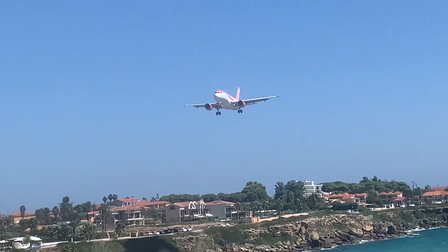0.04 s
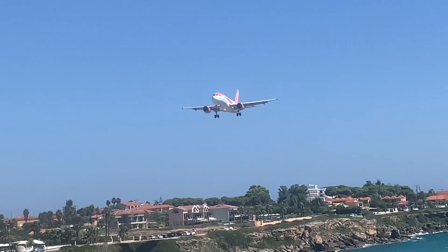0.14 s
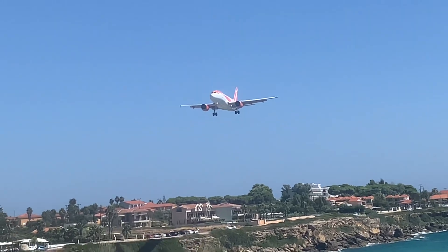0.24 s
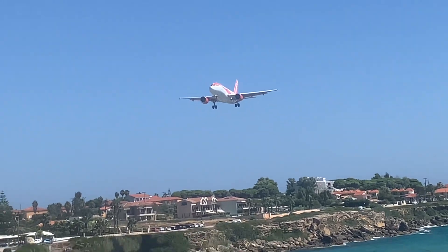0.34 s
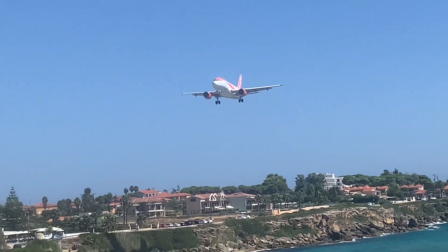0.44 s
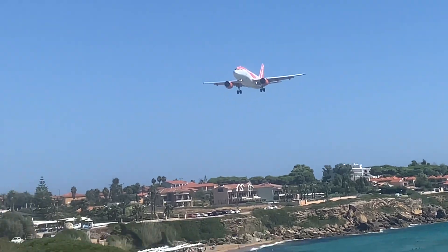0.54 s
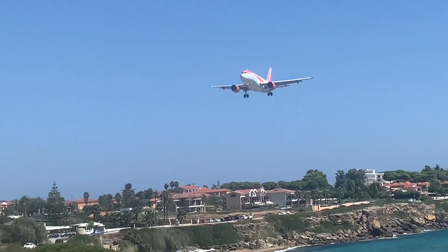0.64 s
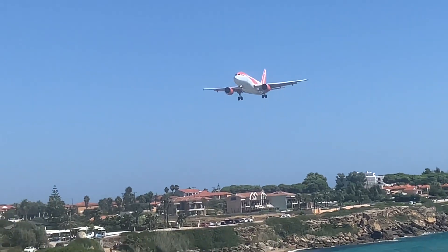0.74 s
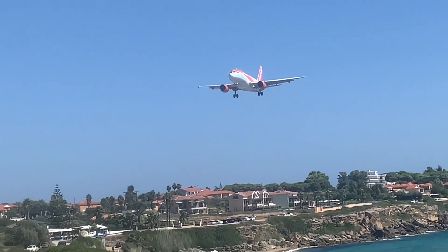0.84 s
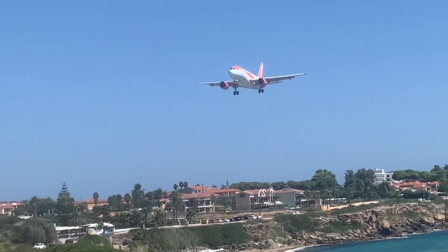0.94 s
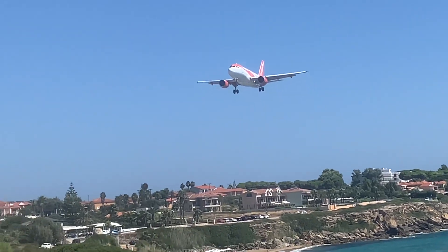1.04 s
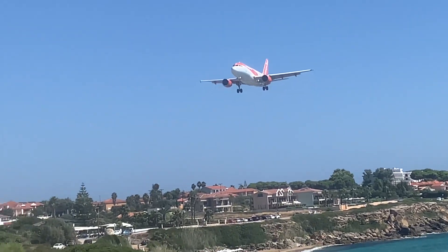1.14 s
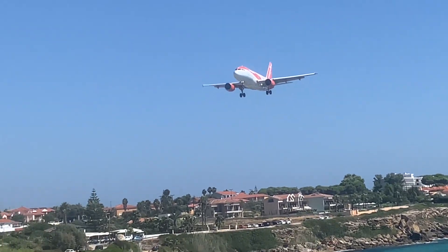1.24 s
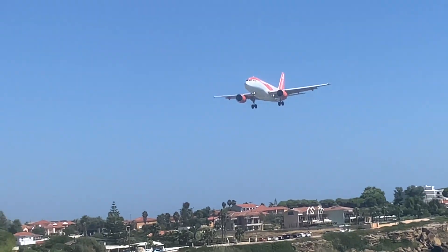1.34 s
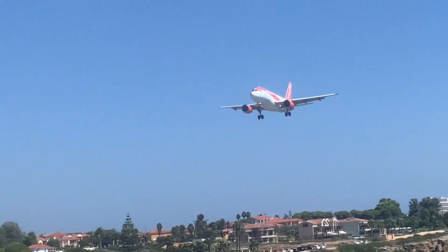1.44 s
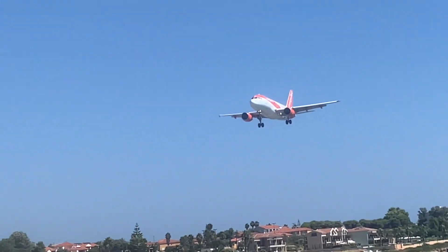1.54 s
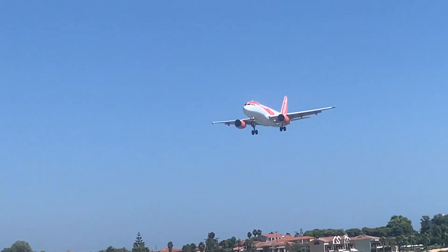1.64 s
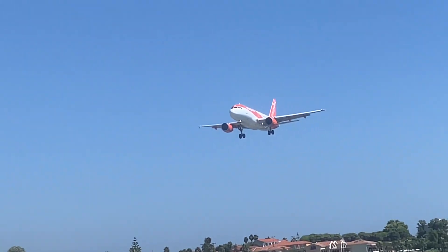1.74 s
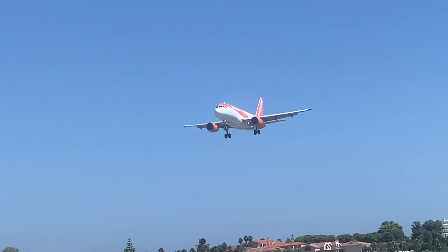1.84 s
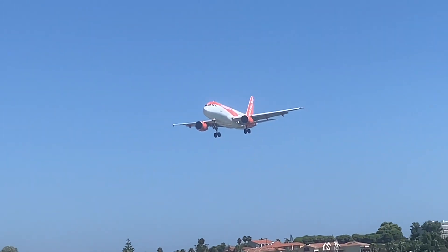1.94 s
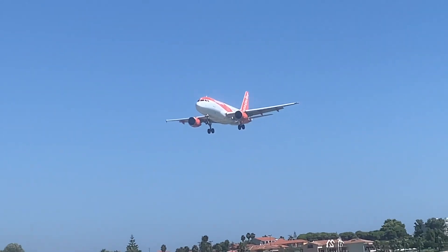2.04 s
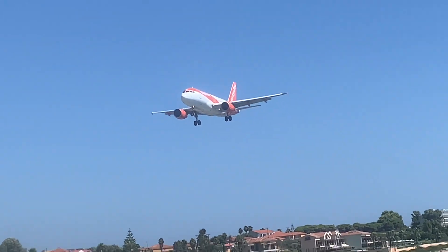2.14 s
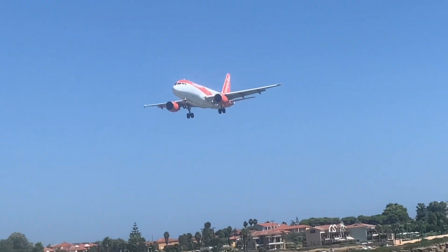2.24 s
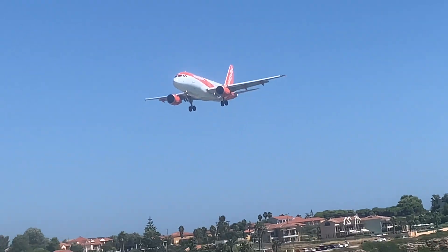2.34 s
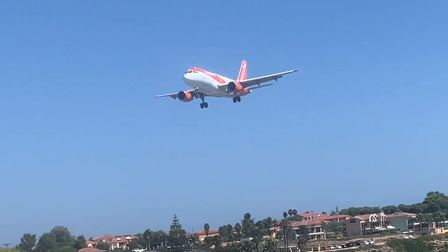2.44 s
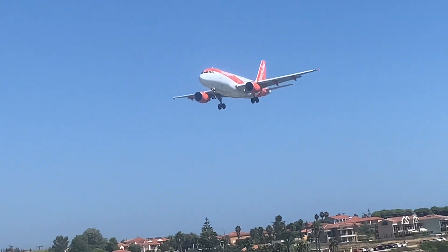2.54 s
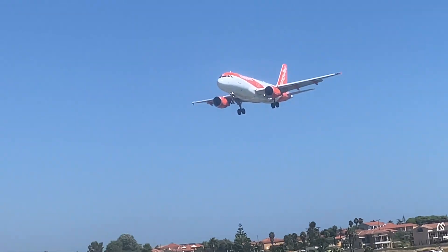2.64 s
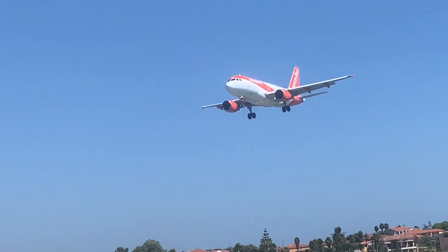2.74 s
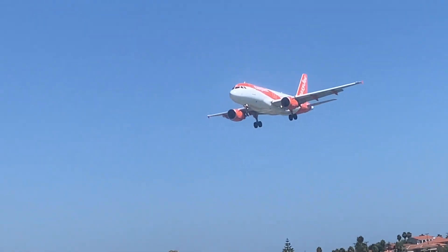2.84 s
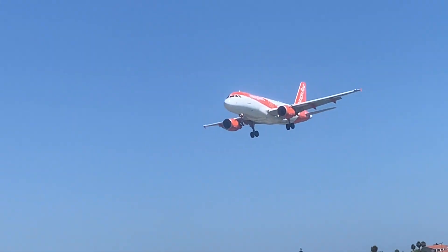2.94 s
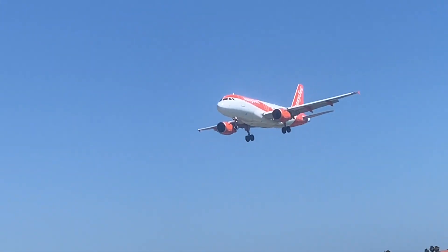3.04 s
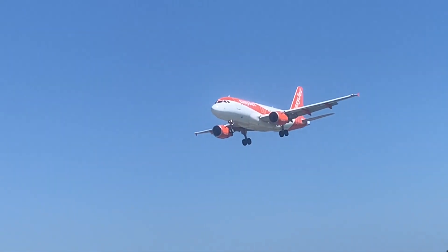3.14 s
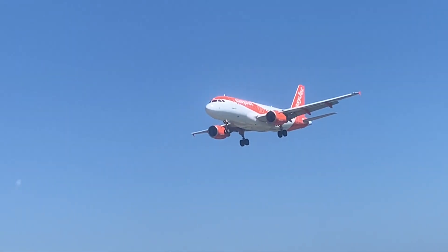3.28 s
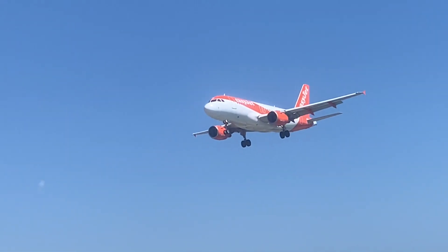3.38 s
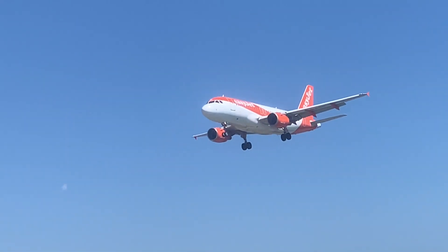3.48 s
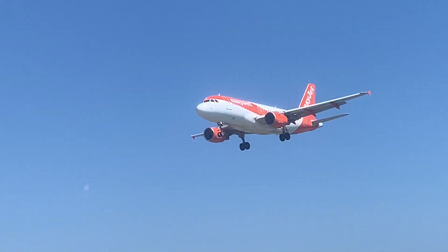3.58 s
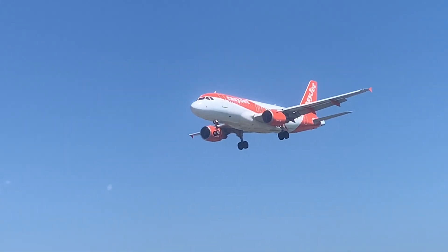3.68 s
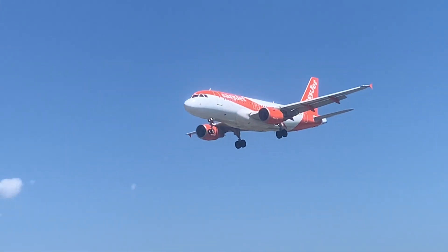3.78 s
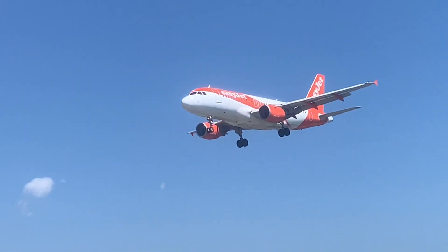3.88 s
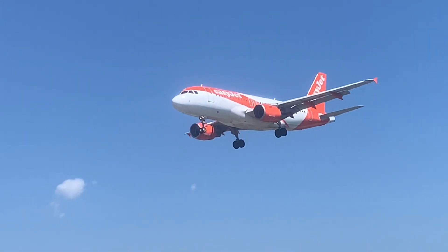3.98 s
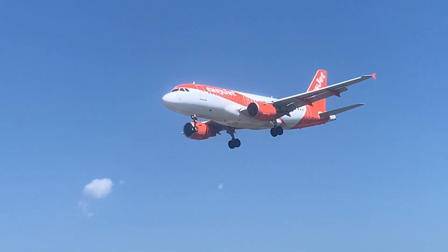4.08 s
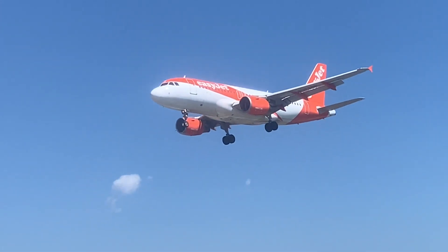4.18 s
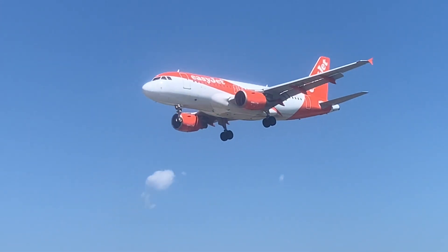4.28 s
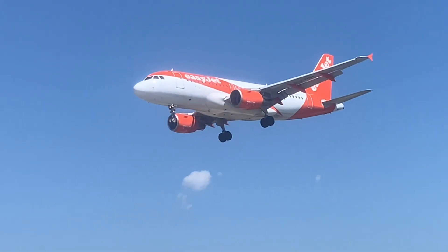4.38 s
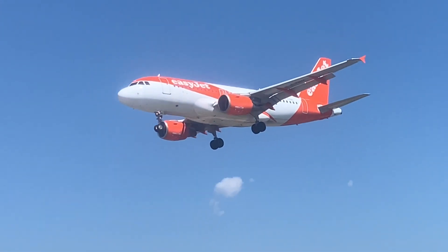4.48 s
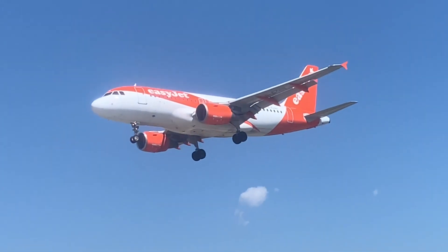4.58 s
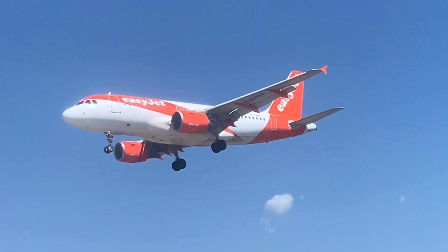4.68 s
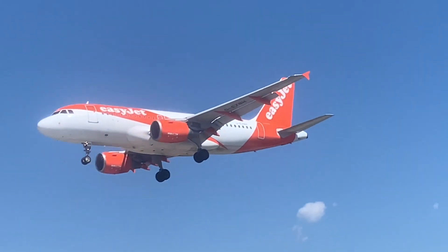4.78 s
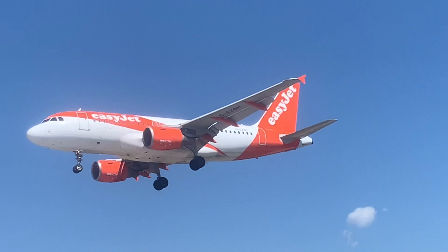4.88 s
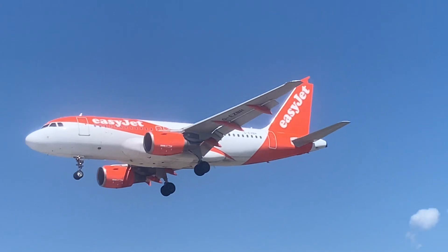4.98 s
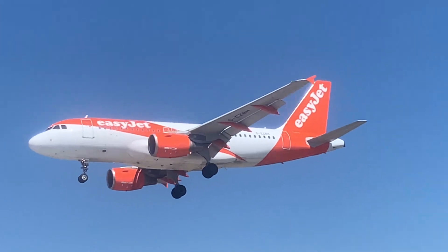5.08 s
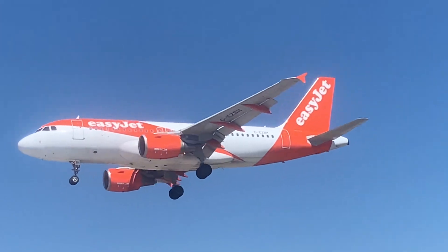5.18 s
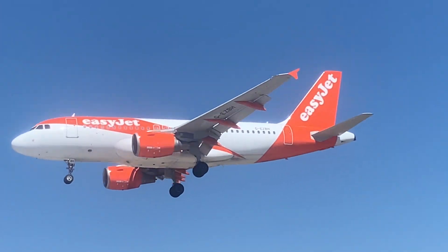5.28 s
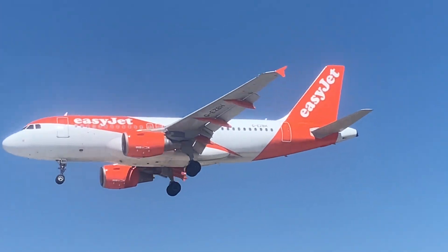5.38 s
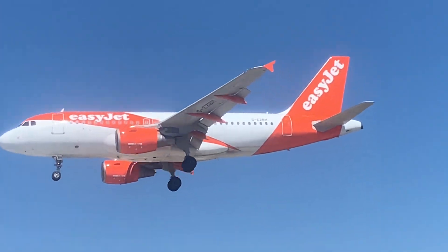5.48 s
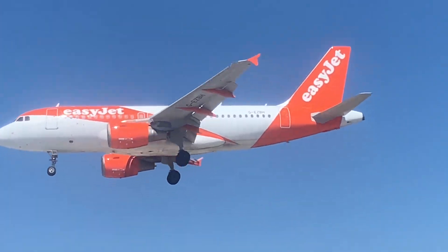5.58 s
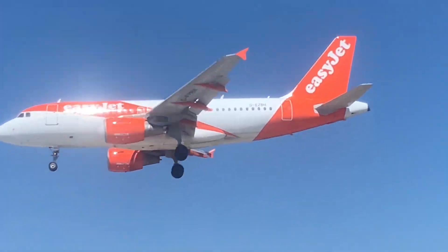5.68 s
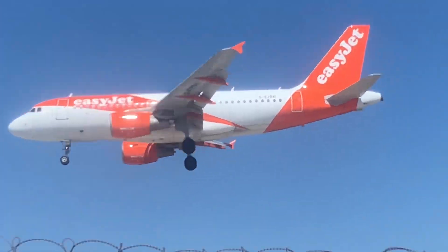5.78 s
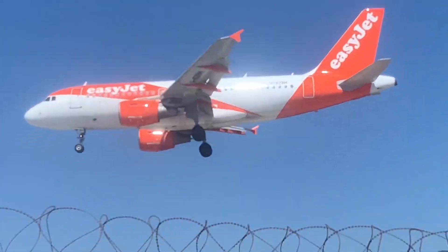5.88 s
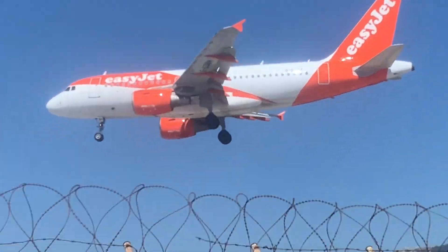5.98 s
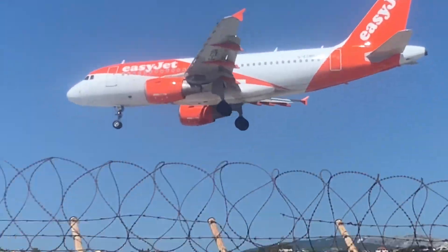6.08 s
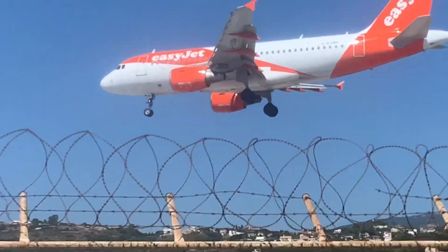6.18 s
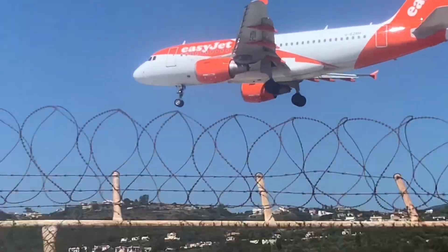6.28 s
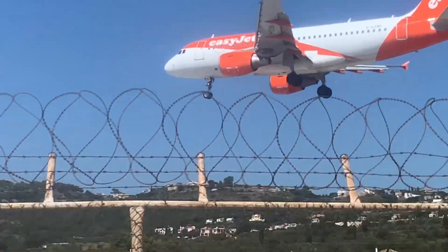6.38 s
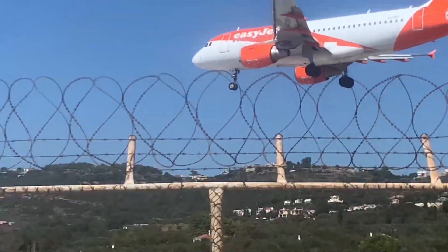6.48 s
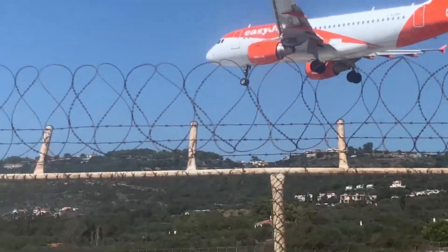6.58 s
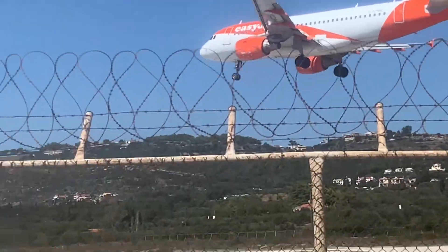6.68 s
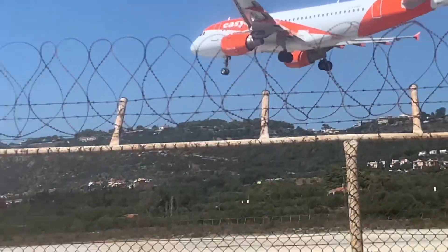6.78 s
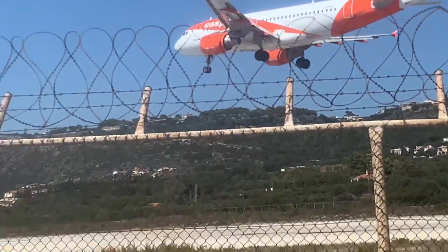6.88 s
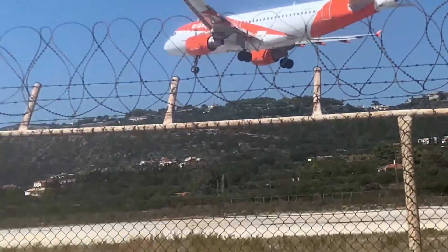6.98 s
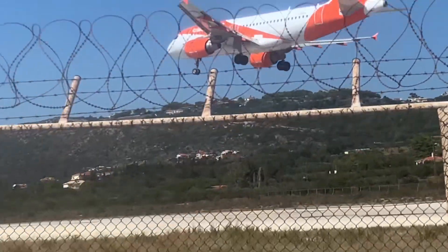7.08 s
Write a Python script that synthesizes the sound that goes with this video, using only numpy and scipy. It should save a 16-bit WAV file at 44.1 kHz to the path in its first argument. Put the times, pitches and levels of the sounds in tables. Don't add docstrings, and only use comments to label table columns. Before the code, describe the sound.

Gusts rumble and slap at a handheld phone, strongest around two seconds, over soft far surf. An approaching jet builds behind them, briefly bursts fuller, dips, then roars wide and close. Its buzzy turbine whine and bright hiss peak before five seconds, then the pitch drops as it passes, leaving a darker roar, echo off the ground and deep uneven thuds.

```python
import sys
import numpy as np
from scipy import signal
from scipy.fft import rfft, irfft, next_fast_len
from scipy.io import wavfile
from scipy.ndimage import uniform_filter1d, minimum_filter1d, map_coordinates

SR = 44100
rng = np.random.default_rng(int(sys.argv[2]) if len(sys.argv) > 2 else 0)


def voltage_ratio(level):
    return 10 ** (np.asarray(level, float) / 20)


def wrap_up_sound(samples):
    columns = np.atleast_2d(samples).T
    tamed = np.clip(columns, -1, 1)
    steps = np.round(tamed * 32767).astype(np.int16)
    wavfile.write(sys.argv[1], SR, steps)


N = 313992
T = np.arange(N) / SR


def unit(x):
    return x / np.sqrt(np.mean(x ** 2) + 1e-20)


def along(points, hz):
    f, v = np.transpose(points)
    return np.interp(np.log(hz + 1), np.log(f + 1), v)


def curves(rows):
    s, *cols = np.transpose(rows)
    return [np.interp(T, s, c) for c in cols]


def wobble(rate):
    coarse = np.arange(0, N + 32, 32)
    knots = rng.standard_normal(int(N * rate / SR) + 4)
    return np.interp(np.arange(N), coarse, map_coordinates(knots, [coarse * rate / SR]))


def turned(at_s, over_s):
    return .5 + .5 * np.tanh((T - at_s) / over_s)


def passing(at_s, span_s):
    return np.exp(-((T - at_s) / span_s) ** 2)


def filtered(x, response):
    m = next_fast_len(N + 8192)
    return irfft(rfft(x, m) * response(np.fft.rfftfreq(m, 1 / SR)), m)[..., :N]


def rush(spectrum, patchy_db, count):
    z = signal.stft(rng.standard_normal((count, N)), nperseg=512)[2]

    def field(bins, steps):
        grain = uniform_filter1d(rng.standard_normal(z.shape[1:]), bins, 0)
        return unit(uniform_filter1d(grain, steps, 1))

    gain_db = patchy_db * (field(bins=6, steps=10) + 1.2 * field(bins=2, steps=60))
    rows = signal.istft(z * voltage_ratio(gain_db), nperseg=512)[1][:, :N]
    closed = [(0.89, -120)] + list(spectrum) + [(spectrum[-1][0], -120)]
    return unit(filtered(rows, lambda hz: voltage_ratio(along(closed, hz))))


# start_s, end_s
FILTER_OPEN = [
    (3.638, 3.875),
    (4.196, 8),
]
SWITCH_S = 0.0056


def ducked():
    return 1 - sum(turned(start, SWITCH_S / 2) - turned(end, SWITCH_S / 2) for start, end in FILTER_OPEN)


# freq_hz, level_db (per Hz)
SURF_COLOUR = [(500, -36), (1000, -8), (1500, 4.5), (1900, -4), (2300, 11), (2600, -31), (2850, -5),
               (3250, -1), (3700, -8.5), (4100, -5), (4700, -14), (5250, -14), (6000, -22), (7000, -50)]


def surf():
    middle, around = voltage_ratio(-50.5) * rush(SURF_COLOUR, patchy_db=.7, count=2)
    return middle + 0.57 * around * [[1], [-1]]


# start_s, end_s
TOP_FLECKS = [
    (6.5, 6.7),
    (6.77, 6.93),
]


def scattered_hiss():
    hz, t, z = signal.stft(rng.standard_normal(N), SR, nperseg=1024)
    hz = hz[:, None]
    share = np.interp(t, [0, 1, 2.4, 3], [1, .8, .5, 0])
    share = share * np.interp(hz, [8800, 8900, 13700, 14400], [0, .9, .35, 0])
    late = sum((t > a) & (t < b) for a, b in TOP_FLECKS) * ((hz > 12500) & (hz < 15600))
    luck = rng.random((len(hz) // 4 + 1, len(t) // 2 + 1))
    cells = np.repeat(np.repeat(luck, 4, 0), 2, 1)[:len(hz), :len(t)]
    kept = (cells < share) * np.interp(hz, [9000, 11000], [2, 1]) + 2.5 * (cells < .5 * late)
    return voltage_ratio(-87) * signal.istft(z * kept, SR, nperseg=1024)[1][:N]


# start_s, hold_s, level_db
GUST_TIMES = [(0, 0.028, -41.5), (0.1, 0.023, -44), (0.17, 0.032, -49), (0.286, 0.098, -40),
              (0.373, 0.087, -34.5), (0.506, 0.019, -37.5), (0.882, 0.033, -40), (0.972, 0.027, -38),
              (1.045, 0.11, -43.5), (1.22, 0.081, -37.5), (1.286, 0.13, -33), (1.44, 0.15, -38),
              (1.666, 0.08, -40.5), (1.797, 0.038, -35), (1.9, 0.4, -30.5), (2.093, 0.1, -26.5),
              (2.325, 1.07, -31.5), (3.343, 0.26, -35.5), (3.634, 0.4, -36.5), (4.207, 2.71, -33.5)]


def gust_level():
    breeze_db, rise_s, fall_s, opened_db = -49, 0.026, 0.022, 7
    power = voltage_ratio(2 * breeze_db)
    for start, hold, db in GUST_TIMES:
        fall = np.exp(-np.maximum(T - start - hold, 0) / fall_s)
        power = power + voltage_ratio(2 * db) * turned(start, rise_s) * fall
    return 10 * np.log10(power) + opened_db * (1 - ducked())


# freq_hz, level_db (per Hz)
DEEP_COLOUR = [(15, -58), (30, -28), (50, 4), (65, 3.5), (100, 6), (140, -5.5), (220, -17.5)]
# freq_hz, level_db (per Hz)
EDGE_COLOUR = [(80, -33), (130, -1.5), (240, -4), (400, -6.5), (700, -18.5), (1100, -25), (1600, -32.5)]


def buffeting():
    lumps = wobble(30)
    deep = unit(voltage_ratio(lumps) * rush(DEEP_COLOUR, patchy_db=0, count=1)[0])
    edge_db = 1.55 * lumps + 1.27 * wobble(70)
    edge = unit(voltage_ratio(edge_db) * rush(EDGE_COLOUR, patchy_db=-0.75, count=1)[0])
    sheltered_db = np.interp(T, [2.9, 4.2, 4.55, 4.95, 5.4, 5.7, 6, 6.4, 6.8, 7.1],
                             [-1, 1.5, 0.5, -4, -2.5, -1.5, -3.0, -0.5, -6.5, 2.0])
    graze_db = -6 * passing(2.12, 0.14)
    return voltage_ratio(gust_level()) * (voltage_ratio(graze_db) * deep + voltage_ratio(1.5 + sheltered_db) * edge)


# start_s, peak_db
PUFF_TIMES = [(0.277, -41), (0.404, -31), (0.509, -34), (0.876, -38), (.995, -41), (1.214, -33),
              (1.308, -33), (1.382, -30), (1.415, -35), (1.8, -34), (1.964, -23), (2.103, -27), (2.21, -32),
              (2.34, -33), (2.599, -31)]
# start_s, peak_db
MORE_PUFF_TIMES = [(0.279, -40), (0.324, -38), (0.359, -36), (0.385, -43), (0.441, -34), (0.502, -28),
                   (0.878, -41), (0.953, -34), (0.985, -31), (1.082, -27), (1.153, -30), (1.217, -29),
                   (1.257, -29), (1.309, -29), (1.309, -30.5), (1.384, -38), (1.641, -27), (1.802, -25.5),
                   (1.878, -22), (1.938, -22), (1.966, -22), (2.024, -24), (2.071, -20), (2.141, -17),
                   (2.236, -14), (2.32, -19), (2.365, -30), (2.388, -17), (2.537, -15), (2.574, -16),
                   (2.649, -14), (2.685, -26), (2.721, -23), (2.745, -16), (2.915, -27), (2.945, -26)]
# freq_hz, level_db (per Hz)
PUFF_COLOUR = [(250, -25), (420, 0), (700, -3), (1100, -11), (1500, -24), (1800, -50)]


def puffs():
    more_puffs_db = -16.5
    starts = np.zeros(N)
    starts[[round(s * SR) for s, _ in PUFF_TIMES]] = voltage_ratio([db for _, db in PUFF_TIMES])
    starts[[round(s * SR) for s, _ in MORE_PUFF_TIMES]] += voltage_ratio([db + more_puffs_db for _, db in MORE_PUFF_TIMES])
    age = T[:SR // 10]
    shape = (1 - np.exp(-age / .0015)) ** 2 * np.exp(-age / .009)
    swell = 1.5 * signal.fftconvolve(starts, shape)[:N]
    return swell * rush(PUFF_COLOUR, patchy_db=0, count=1)[0]


def pressure_dips(events):
    half_length_cycles = 0.84
    out = np.zeros(N)
    for s, db, hz in events:
        near = slice(round((s - .06) * SR), round((s + .06) * SR))
        turns = (T[near] - s) * hz
        out[near] -= voltage_ratio(db) * np.exp(-(turns / half_length_cycles) ** 2) * np.cos(2 * np.pi * turns)
    return out


# peak_s, peak_db, pitch_hz
KNOCK_TIMES = [(.11, -38, 150), (.285, -28, 206), (0.364, -25.5, 130), (0.417, -24, 119), (.457, -31, 150),
               (0.521, -22, 190), (0.884, -29.5, 254), (.995, -27, 170), (1.089, -33, 200),
               (1.224, -35, 220), (1.311, -25, 190), (1.399, -21, 181), (1.481, -23.5, 132),
               (1.55, -28, 120), (1.807, -28, 201), (1.882, -22.5, 180), (1.97, -31, 300), (2.15, -17, 196),
               (2.235, -21, 221), (2.175, -20, 170), (2.06, -24, 150), (2.331, -18.5, 202),
               (2.539, -23, 202)]


def knocks():
    return pressure_dips(KNOCK_TIMES)


# peak_s, peak_db, pitch_hz
THUMP_TIMES = [(4.436, -18, 60), (4.726, -20, 60), (5.198, -15, 75), (5.378, -29, 60), (5.583, -13, 58),
               (5.709, -19, 69), (6.03, -22, 70), (6.12, -14, 59.6), (6.281, -10.5, 62.4), (6.446, -17, 65),
               (6.532, -10, 53.7), (6.617, -13, 69.6), (6.73, -21, 65), (6.837, -46, 60),
               (7.11, -13.5, 53.7)]


def thumps():
    return pressure_dips(THUMP_TIMES)


# freq_hz, level_db (per Hz)
SUB_COLOUR = [(12, -45), (22, -6), (32, -2), (42, -1), (55, -19), (70, -120)]


def sub_rumble():
    sub = unit(filtered(rng.standard_normal(N), lambda hz: voltage_ratio(along(SUB_COLOUR, hz))))
    return voltage_ratio(-38 + 1.5 * np.minimum(T - 6.2, 0)) * (1 - ducked()) * sub


# freq_hz, level_db (per Hz)
EXHAUST_COLOUR = [(18, -42), (30, -17), (42, -5), (62, 0), (100, -6), (140, -13), (220, -40)]


def exhaust_lobe():
    peak_s, span_s, peak_db = 7.04, 1, -25.5
    level_db = peak_db - 3.4 * ((T - peak_s) / span_s) ** 2 / 2
    return voltage_ratio(level_db) * rush(EXHAUST_COLOUR, patchy_db=0, count=1)[0]


# time_s, level_db
NEARNESS = [(0, -27), (.7, -24.5), (1.4, -20.5), (2, -16), (2.6, -13.5), (3, -9.5), (3.3, -2.5), (3.6, -2),
            (3.9, -7), (4.2, -2.5), (4.45, -3.5), (4.75, -1.5), (5.2, -2), (5.7, -5), (6.4, -6),
            (7.12, -9.5)]
# peak_s, half_width_s, level_db
AIR_SWELLS = [(.85, 0.32, 2), (1.64, 0.032, 2.5), (2.3, 0.021, 4), (2.82, 0.18, 0.5), (3.17, 0.082, 2.5),
              (3.354, 0.058, 4), (3.548, 0.022, 0.5), (3.663, 0.046, 5), (3.827, 0.023, 3),
              (4.26, 0.017, 1), (4.66, 0.11, 1.5), (5.751, 0.059, 1.5), (6.122, 0.2, -1.5),
              (6.5, 0.18, 0.5)]


def levels():
    near = curves(NEARNESS)[0]
    swell = sum(db * passing(s, width) for s, width, db in AIR_SWELLS)
    first = turned(FILTER_OPEN[0][0], SWITCH_S) - turned(FILTER_OPEN[0][1], SWITCH_S)
    inlets_away = turned(5.03, 0.19)

    roar_db = -27 + near + 1.57 * swell - 9 * ducked()

    fan_db = -33.5 + near + 1.7 * swell - 4 * inlets_away
    fan_db += 3 * turned(5.9, 0.1)
    fan_db += 0.5 * first

    air_loss_db = 0.04 * np.maximum(near, -24) ** 2
    hiss_db = -43 + 0.4 * near - air_loss_db + 0.27 * swell + 1.5 * inlets_away
    hiss_db += 5.5 * passing(4.67, 0.35)

    front_db, rear_db = -14, 8
    body_db = front_db + (rear_db - front_db) * turned(3.48, 1) - 0.41 * swell
    body_db += 9 * (turned(3.18, .05) - turned(3.6, .03))
    body_db += 1.5 * passing(5.94, 0.69)
    body_db += 1.5 * first
    return roar_db, fan_db, hiss_db, body_db


# freq_hz, level_db (per Hz)
SPLASH_COLOUR = [(8900, -50), (9000, 4), (9300, 3), (10200, -3), (10900, -10), (11000, -50)]


def splashes():
    hz, t, z = signal.stft(rush(SPLASH_COLOUR, patchy_db=2, count=1)[0], SR, nperseg=1024)
    hiss_db = levels()[2]
    frame, band = np.arange(len(t)) // 2, (hz // 330).astype(int)
    luck = rng.standard_normal(frame[-1] + 1)
    luck = luck + .55 * rng.standard_normal((band[-1] + 1, frame[-1] + 1))
    f = hz[:, None]
    need = -.2 + (f - 9100) / 900 * (f < 9500) + .45 * (f >= 9500) + (f > 10230)
    need = need + np.clip(-(np.interp(t, T, hiss_db) + 44) / 8, 0, 3)
    kept = luck[band][:, frame] > need
    return voltage_ratio(hiss_db - 15) * signal.istft(z * kept, SR, nperseg=1024)[1][:N]


# time_s, delay_ms
GROUND_DELAY = [(0, 1.6), (2.5, 1.23), (3.55, 1.19), (3.63, 2.05), (4.2, 2.26), (5, 2.344), (5.9, 2.9),
                (7.12, 2.98)]


def ground_echo(low):
    late = np.arange(N) - curves(GROUND_DELAY)[0] * SR / 1000
    bounce = np.array([np.interp(late, np.arange(N), row) for row in low])
    scrub, concrete = 0.24, .8
    strength = scrub + (concrete - scrub) * turned(6.22, .15)
    return strength * filtered(bounce, lambda hz: 1 / (1 + (hz / 1300) ** 3))


# freq_hz, level_db (per Hz)
BODY_COLOUR = [(70, -37), (120, -15), (220, -12), (330, -1), (600, -8), (850, -6.5), (990, -4), (1150, -67),
               (1400, -79.5)]
# freq_hz, level_db (per Hz)
ROAR_COLOUR = [(700, -41), (1000, 5), (1300, 0.5), (1750, 6), (2100, 0), (2250, -20), (2400, -69)]
# freq_hz, level_db (per Hz)
FAN_COLOUR = [(2050, -12), (2250, -8.5), (2600, -2.5), (3100, -8), (3500, -16), (3800, -17.5),
              (4700, -20.5), (5600, -27), (6400, -21)]
# freq_hz, level_db (per Hz)
HISS_COLOUR = [(4600, -5.5), (5200, -9.5), (7000, -2.5), (7600, -6.5), (7930, -9), (8050, 3.5), (8500, -6),
               (8900, -9.5), (9800, -15.5), (10400, -20.5), (10900, -8.5)]


def roar():
    roar_db, fan_db, hiss_db, body_db = levels()
    eddies_db = .4 * wobble(4.6) + .9 * wobble(14)
    low = voltage_ratio(roar_db + body_db + wobble(9)) * rush(BODY_COLOUR, patchy_db=0.0, count=2)
    low += voltage_ratio(roar_db + 5.5 + 1.05 * wobble(10)) * rush(ROAR_COLOUR, patchy_db=1.5, count=2)
    low += voltage_ratio(fan_db + 7.0 + eddies_db) * rush(FAN_COLOUR, patchy_db=2.03, count=2)
    low += ground_echo(low)
    opened = np.interp(T, [4.7, 5.3], [0, .7])
    low -= opened * filtered(low, lambda hz: np.exp(-((hz - 2270) / 55) ** 2))
    hidden = 0.12 * np.exp(-((T - 4.26) / 0.69) ** 4)
    low -= hidden * filtered(low, lambda hz: np.exp(-((hz - 2600) / 380) ** 4))
    hiss = voltage_ratio(hiss_db + 3.5 + eddies_db + 0.3 * wobble(36)) * rush(HISS_COLOUR, patchy_db=1.7, count=2)
    return low + hiss


def tone(hz, db, drift, fade_db):
    phase = 2 * np.pi * np.cumsum(hz * (1 + drift * wobble(40))) / SR
    return np.sqrt(2) * voltage_ratio(db + fade_db * wobble(16)) * np.sin(phase)


# start_s, end_s, from_hz, to_hz,
# level_db
BRIEF_TONES = [(.72, 1.1, 2115, 2125, -57), (2.35, 3.3, 2102, 2085, -52), (4.25, 4.9, 2050, 1985, -36),
               (6.08, 6.5, 7250, 7050, -48), (6.08, 6.45, 7050, 6900, -50), (5.2, 5.9, 735, 700, -31),
               (6.22, 6.72, 345, 325, -27), (3.63, 3.88, 690, 630, -33), (4.2, 4.6, 720, 700, -35),
               (4.35, 4.75, 205, 205, -30), (3.2, 4.5, 6200, 6190, -58)]


def brief_tones():
    out = np.zeros(N)
    for start, end, from_hz, to_hz, db in BRIEF_TONES:
        u = np.clip((T - start) / (end - start), 0, 1)
        drift = 0.003 * (1 + 3 * (from_hz > 6500) + 16 * (from_hz < 1000))
        glide = tone(from_hz + (to_hz - from_hz) * u, db, drift, fade_db=3.5)
        out += np.sqrt(np.sin(np.pi * u) + 1e-12) * glide
    return out


# time_s, pitch_hz, level_db
BLADE_TONE = [(0, 1985, -64), (.8, 2020, -59), (1.4, 2075, -59), (2.2, 2148, -56), (2.55, 2198, -48),
              (3, 2225, -45), (3.45, 2250, -38), (3.9, 2252, -47), (4.2, 2242, -43), (4.55, 2195, -38),
              (4.85, 2122, -30), (5.05, 2055, -34), (5.4, 1950, -32), (5.7, 1812, -38), (6, 1752, -34),
              (6.4, 1700, -33), (6.8, 1645, -40), (7.12, 1600, -40)]
# multiple (of the blade rate), level_db
BLADE_OVERTONES = [(2, 4), (2.56, -3), (3, -5), (3.55, -13)]


def engines():
    blade_hz, blade_db = curves(BLADE_TONE)
    near = curves(NEARNESS)[0]
    shield_db = 27 * turned(5.35, .3)
    beam_db = 6 * passing(4.67, .4)
    over_db = -56 + .7 * near - shield_db + beam_db
    whine_db = -51 + 1.7 * near - shield_db + 1.7 * beam_db - 8 * turned(5, .1)
    out = tone(blade_hz, blade_db, drift=.0018, fade_db=2.8)
    for multiple, db in BLADE_OVERTONES:
        out += tone(multiple * blade_hz, over_db + db, drift=.0045, fade_db=5)
    out += tone(3.76 * blade_hz, whine_db, drift=0.0032, fade_db=1.5)
    return out + brief_tones()


# freq_hz, phase_rad
PHASE_LEAD = [(560, 0), (690, -.6), (800, -1.5), (845, -4), (990, -6.4), (1160, -9.1), (1240, -9.4),
              (1280, -13.2), (1400, -13.4), (1470, -12.8), (1560, -11.6), (1900, -10.6), (2250, -11.7),
              (2650, -10.5), (3000, -9.5), (3250, -10), (3620, -9.6), (3780, -11.4), (4150, -12.6),
              (4700, -13.9), (5150, -15.7), (6200, -18.4), (6900, -19.2), (7500, -22), (8200, -23.3),
              (9000, -24.3), (9700, -26.6)]
# freq_hz, likeness (0 to 1)
LIKENESS = [(280, 1), (400, .93), (600, .99), (820, .8), (950, .97), (3050, .99), (3700, .7), (4500, .7),
            (5250, .97), (6000, .8), (6600, .9), (7300, .5), (8300, .65), (9200, .2)]
# freq_hz, level_db
LEFT_LEAN = [(860, 0), (950, -4), (1040, 0), (1250, 2), (1500, -2), (2400, 1), (3750, -3), (5000, 0),
             (7000, -1), (7800, -5), (8050, -11), (8900, -12), (9020, -14), (9120, -90)]


def wide(common, apart):
    def angle(hz):
        return np.arccos(np.clip(along(LIKENESS, hz), 0, 1)) / 2

    def pair(hz):
        half = voltage_ratio(along(LEFT_LEAN, hz) / 2) * np.exp(-.5j * along(PHASE_LEAD, hz))
        return np.array([half, 1 / half]) * np.sqrt(2 / (abs(half) ** 2 + abs(half) ** -2))

    both = filtered(common, lambda hz: np.cos(angle(hz)) * pair(hz))
    return both + filtered(apart, lambda hz: np.sin(angle(hz)) * pair(hz) * [[1], [-1]])


def scene():
    wind = buffeting() + puffs() + knocks()
    deep_jet = exhaust_lobe() + thumps() + sub_rumble()
    common, apart = roar()
    jet = wide(common + engines(), apart) + splashes() * [[1], [0]]
    return surf() + wind + deep_jet + jet


def middle_kept(mid, side, hz, t):
    def band(z):
        return np.sqrt(abs(uniform_filter1d(uniform_filter1d(abs(z) ** 2, size=9, axis=0), size=3, axis=1)))

    margin_db = -15.5 + 2.5 * np.interp(t, T, wobble(9))
    low_lift_db = 3 * (abs(t - 6.2) < .55) + 3 * (abs(t - 4) < .3) + 1
    lift_db = np.where(hz > 4000, .3 + 2 * (t < 1.7), low_lift_db)
    drowned = (band(mid) < voltage_ratio(margin_db + lift_db) * band(side)) & (hz > 2700)
    return minimum_filter1d(1. - drowned, size=5, axis=0)


def under_ceiling(hz, t):
    under = hz < 10480 + 170 * np.round(np.interp(t, T, wobble(25)))
    return under & (hz < np.interp(t, [0, 2.6], [9000, 10900]) + 300 * rng.standard_normal(len(t)))


# time_s, lowest_hz (of the sides)
SIDES_FLOOR = [(0, 880), (2.7, 790), (3.2, 610), (3.6, 520), (3.75, 450), (4.1, 460), (4.3, 545),
               (5.85, 540), (6.1, 350), (6.5, 310), (7.12, 240)]


def side_balance(side, hz, t, abeam):
    side = side * voltage_ratio(4 * abeam * ((hz < 1400) + 1.2 * (hz < 520)))
    far_db = -4.5 * (hz < 1500) * (t < 1.8)
    near_db = 5 * np.exp(-((hz - 1200) / 110) ** 2) * (t > 4.6)
    floor_hz = np.interp(t, *np.transpose(SIDES_FLOOR)) * voltage_ratio(.7 * np.interp(t, T, wobble(10)))
    return side * voltage_ratio(far_db + near_db) * (hz > floor_hz)


def band_limit(x):
    return signal.sosfilt(signal.butter(12, 15700, fs=SR, output="sos"), x)


# freq_hz, level_db
SIDE_TINT = [(2200, 0), (2350, -4), (3000, -4), (3250, 0), (4000, -2), (4700, 0), (5300, 4), (6200, 0)]


def record(dry):
    halves = np.array([dry[0] + dry[1], dry[0] - dry[1]]) / 2
    hz, t, (mid, side) = signal.stft(halves, SR, nperseg=2048)
    hz = hz[:, None]
    side = side * voltage_ratio(along(SIDE_TINT, hz))
    kept = middle_kept(mid, side, hz, t)
    under = under_ceiling(hz, t)
    abeam = np.interp(t, [5.85, 6.1], [0, 1])
    mid = mid * voltage_ratio(-8 * abeam * np.exp(-((hz - 850) / 60) ** 2))
    side = side_balance(side, hz, t, abeam)
    mid, side = signal.istft(np.array([mid * kept, side]) * under, SR, nperseg=2048)[1][:, :N]
    mid = mid + scattered_hiss()
    return band_limit(np.array([mid + side, mid - side]))


dry = scene()
out = record(dry)
wrap_up_sound(out)
```